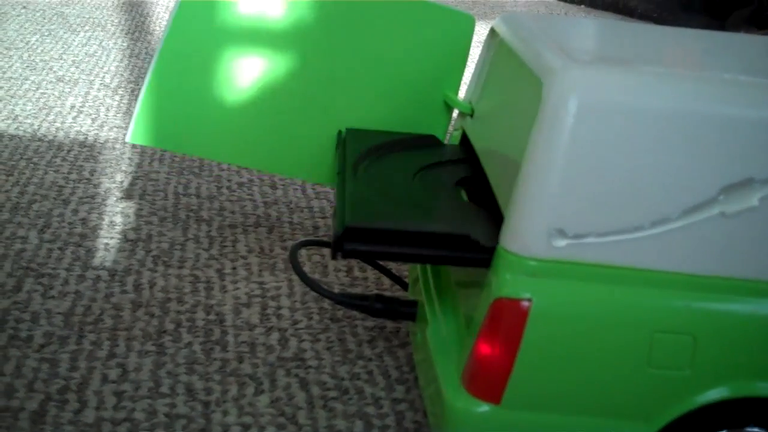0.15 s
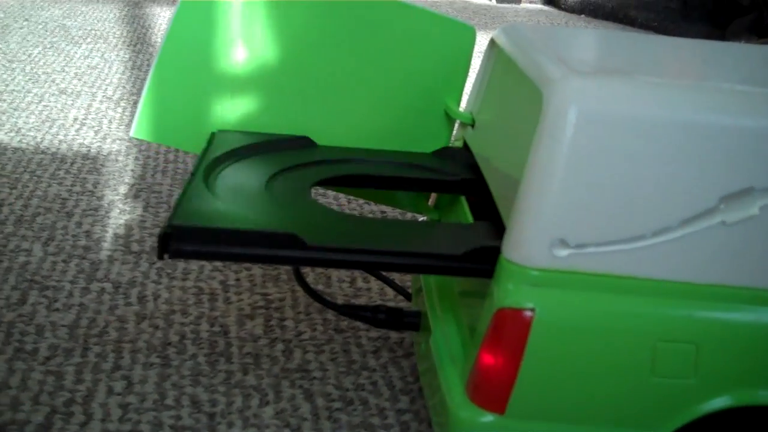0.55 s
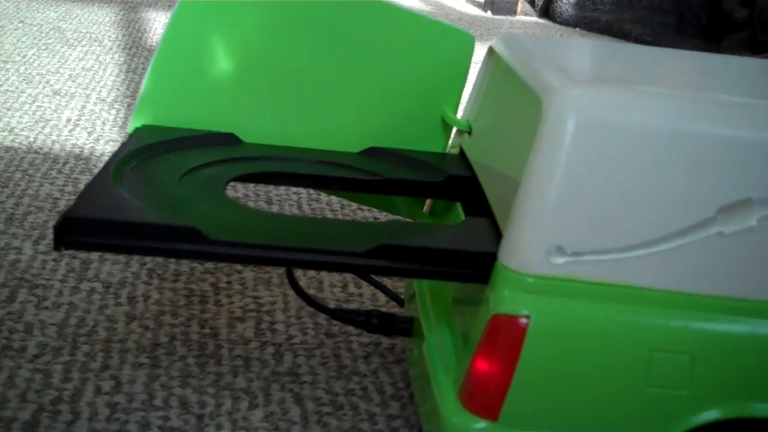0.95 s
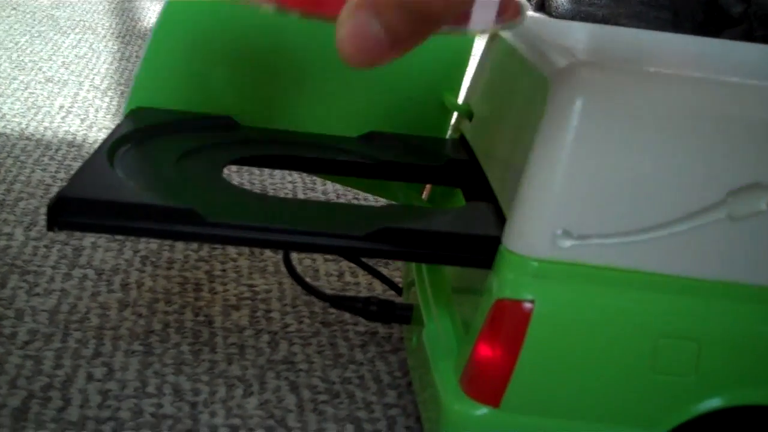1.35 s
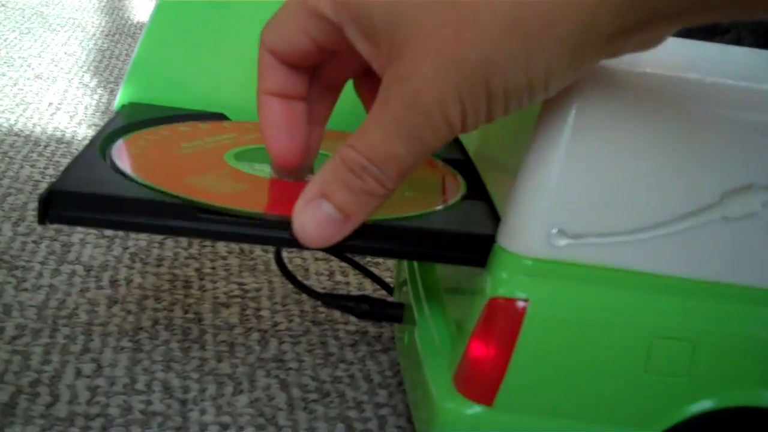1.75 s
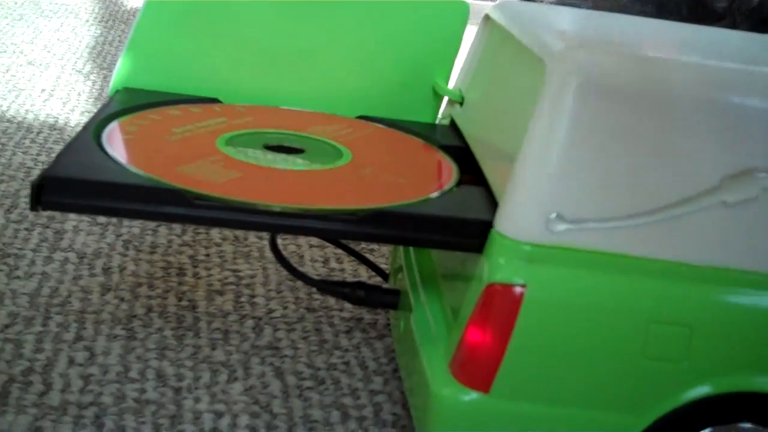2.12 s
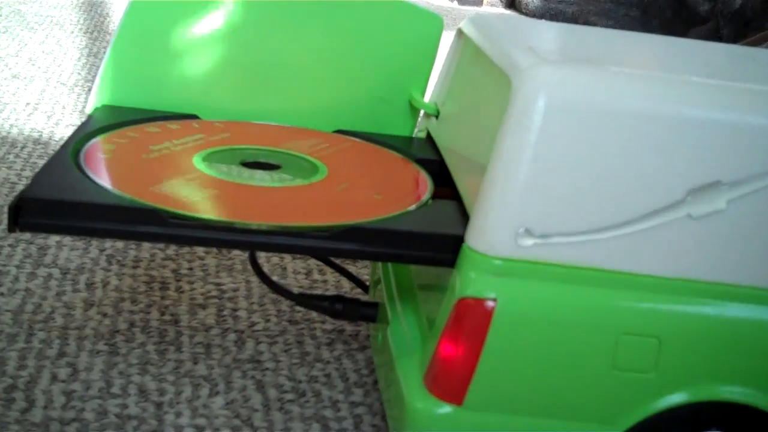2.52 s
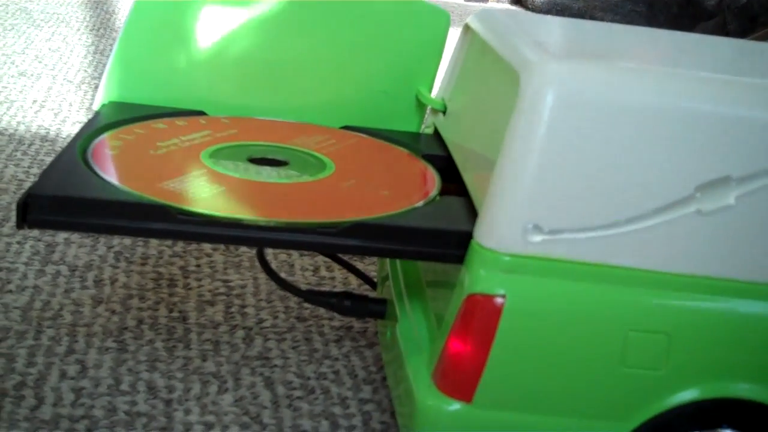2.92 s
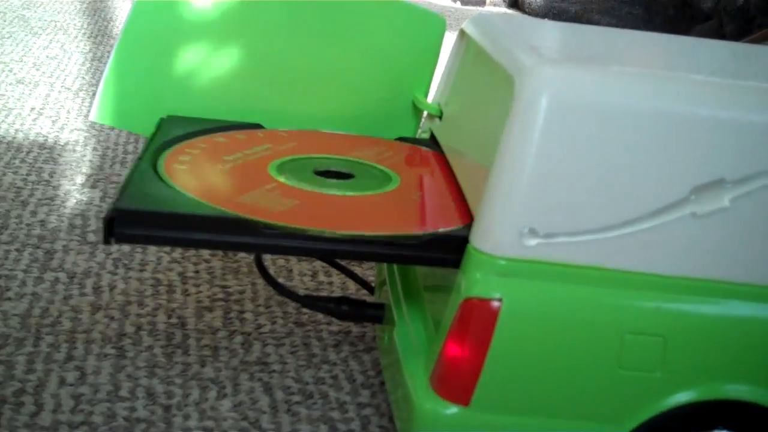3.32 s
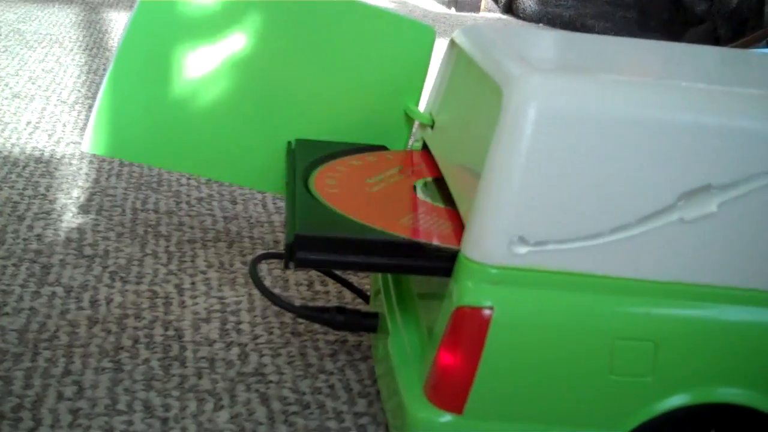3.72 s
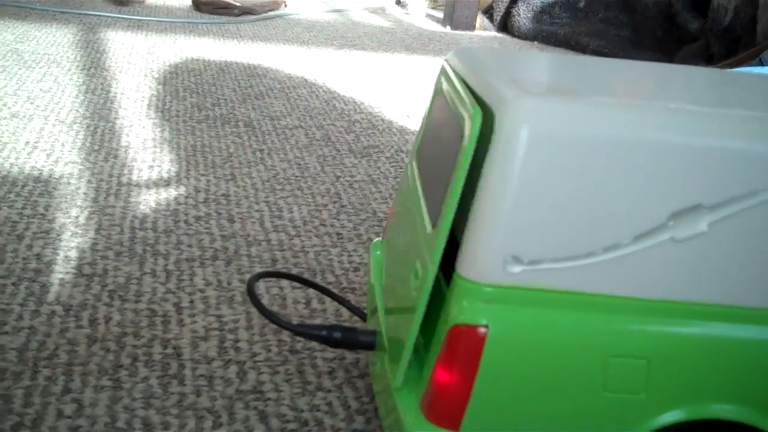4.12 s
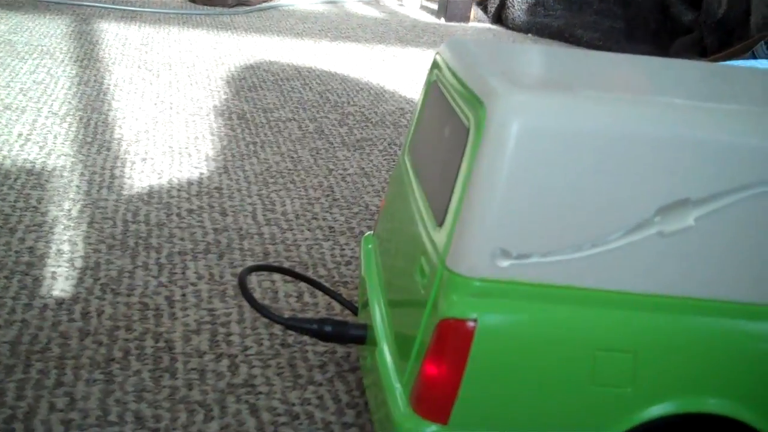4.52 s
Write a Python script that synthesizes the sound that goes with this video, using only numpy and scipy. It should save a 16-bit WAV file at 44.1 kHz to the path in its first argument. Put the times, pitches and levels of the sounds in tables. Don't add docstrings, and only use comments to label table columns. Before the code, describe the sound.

A small motor whirs a plastic tray out, a disc clacks into it, a button clicks, the tray whirs back and a hatch slams.

```python
import sys
import numpy as np
from scipy import signal
from scipy.fft import rfft, irfft, next_fast_len
from scipy.io import wavfile
from scipy.ndimage import uniform_filter1d, map_coordinates

SR = 44100
rng = np.random.default_rng(int(sys.argv[2]) if len(sys.argv) > 2 else 0)


def attenuation_scalar(level_db):
    decades = np.asarray(level_db, float) / 20
    return 10 ** decades


def dump_mix(stems):
    frames = np.atleast_2d(stems).T
    limited = np.clip(frames, -1, 1)
    pcm = np.round(limited * 32767).astype(np.int16)
    wavfile.write(sys.argv[1], SR, pcm)


N = 205542


def unit(x):
    return x / np.sqrt(np.mean(x ** 2) + 1e-20)


def along(points, hz):
    f, v = np.transpose(points)
    return np.interp(np.log(hz + 1), np.log(f + 1), v)


def curves(spans):
    t = np.arange(N) / SR
    time_s, *columns = np.transpose(np.concatenate(spans))
    gate = sum((t >= span[0][0]) & (t <= span[-1][0]) for span in spans) > 0
    return [np.interp(t, time_s, c) for c in columns], uniform_filter1d(gate * 1., size=600, mode="nearest")


def wobble(rate_hz):
    knots = rng.standard_normal(int(N * 40 / SR) + 4)
    return map_coordinates(knots, [np.arange(N) * min(rate_hz, 40) / SR])


def filtered(x, response):
    m = next_fast_len(N + SR // 4)
    return irfft(rfft(x, m) * response(np.fft.rfftfreq(m, 1 / SR)), m)[..., :N]


def modes(table):
    def response(f):
        total = 0
        for k, (hz, width_hz, db) in enumerate(table):
            damping = 1j * f * width_hz
            total = total + (-1) ** k * attenuation_scalar(db) * damping / (hz * hz - f * f + damping)
        return total
    return response


def glide(x, hz, width_hz):
    spin = np.exp(2j * np.pi * np.cumsum(np.broadcast_to(hz, len(x))) / SR)
    keep = np.exp(-np.pi * width_hz / SR)
    return np.real(spin * signal.lfilter([1 - keep], [1, -keep], x / spin))


def grit(share, spread_db):
    draw = rng.random((2, N))
    size = attenuation_scalar(-spread_db * np.log(draw[1] + .003))
    return unit((draw[0] < share) * size * rng.standard_normal(N))


# hz, level_db
SHEEN = [(3000, -74), (4500, -4), (6000, -1), (8000, -1), (10000, -3.5), (13000, 3), (16500, -74)]


def sheen(x):
    fold = irfft(np.log(attenuation_scalar(along(SHEEN, np.fft.rfftfreq(1024, 1 / SR)))))
    fold[1:512] *= 2
    fold[513:] = 0
    return signal.fftconvolve(x, irfft(np.exp(rfft(fold))))[:N]


# time_s, whirr_db, load_db, low_ridge_hz
DRIVE = [
    [(0, -45.5, 2.5, 6300), (.13, -42.5, -1, 6300), (.21, -39.5, 0.5, 6500), (.3, -39.5, 0, 7000),
     (.6, -39, -1, 6850), (.75, -43.5, -2, 6450), (.8, -40.5, -0.5, 6350), (.866, -46, 0.5, 6400),
     (.932, -50, -10.5, 6500)],
    [(3.25, -44, 2.5, 6350), (3.34, -40.5, -2, 6400), (3.49, -41, -3.5, 6500), (3.562, -36, -0.5, 6750),
     (3.62, -42, -2, 6250), (3.9, -40.5, -1.5, 6300), (4.02, -41, 2, 6330), (4.1, -39.5, 4, 6550),
     (4.15, -43.5, 3.5, 6550)],
    [(4.151, -49, 0, 6500), (4.256, -63, 3.5, 6500), (4.35, -73, -6.5, 6500), (4.41, -72, -2, 6500),
     (4.5, -95, -22, 6500)],
]
# out_share (0-1), cavity_hz, cavity_db, gear_db, mid_ridge_hz
TRAVEL = [(0, 610, -5, -13, 7780), (0.251, 650, -8, -16, 7620), (.37, 520, 1.5, -15, 7020),
          (.52, 760, -9, -26, 6900), (0.701, 630, -8, -19.5, 7600), (.9, 566, -15.5, -4.5, 7350),
          (1, 440, -6, -21, 7250)]
# pitch_hz, width_hz, level_db
RAIL = [(1430, 400, 3), (1840, 230, 4.5), (2250, 260, 1.5), (3140, 890, -3.5), (4070, 200, -5)]
# pitch_hz, width_hz, level_db
CASE = [(272, 73, -0.2), (395, 190, -7.5), (930, 52, -6)]


def drive():
    stop_out_s, start_in_s, travel_s = 0.92, 3.254, 1
    scrape_db, rumble_db, rumble_per_load, clamp_db = -49.5, -51, 1.31, 9.5
    (whirr_db, load_db, low_hz), on = curves(DRIVE)
    t = np.arange(N) / SR
    place, *shape = np.transpose(TRAVEL)
    out = 1 - np.maximum(stop_out_s - t, t - start_in_s) / travel_s
    cavity_hz, cavity_db, gear_db, mid_hz = [np.interp(out, place, c) for c in shape]
    turn = 2 * np.pi * np.cumsum(74 + 3 * wobble(8.1)) / SR
    load = attenuation_scalar(.7 * np.sin(turn) + .8 * np.sin(2 * turn) + 1.3 * wobble(30))

    def teeth():
        return load * grit(share=.25, spread_db=1.0)

    box = 0
    for ridge_hz, ridge_db in [(low_hz, -5), (mid_hz, -2), (8120, -5.5)]:
        hz = ridge_hz + 120 * wobble(7.3)
        ridge = glide(glide(teeth(), hz, 320), hz, 320)
        box = box + attenuation_scalar(ridge_db + wobble(12)) * unit(ridge)
    gear_mode = modes([(5370, 220, 0)])
    gear = attenuation_scalar(gear_db + 5 + 3 * wobble(13)) * unit(filtered(teeth(), lambda f: gear_mode(f) ** 2))
    hiss = attenuation_scalar(whirr_db - 16) * (box + gear + attenuation_scalar(4) * unit(sheen(teeth())))

    rail = sum(attenuation_scalar(2.2 * wobble(14)) * filtered(teeth(), modes([mode])) for mode in RAIL)
    scrape = attenuation_scalar(scrape_db + load_db) * unit(rail)

    cavity = glide(teeth(), cavity_hz + 70 * wobble(22), 130)
    case = unit(filtered(teeth(), modes(CASE))) + attenuation_scalar(cavity_db + 2) * unit(cavity)
    case_db = rumble_db + rumble_per_load * load_db + clamp_db * (out < 0) + 0.7 * wobble(18)
    return on * (hiss + scrape + attenuation_scalar(case_db) * case)


def ringing(blows, table):
    out, t = np.zeros(N + SR), np.arange(SR // 2) / SR
    onset = 1 - np.exp(-t / 0.0025)
    for start_s, blow_db in blows:
        at = round(start_s * SR)
        for hz, db, t60_s in table:
            rough = unit(glide(rng.standard_normal(len(t)), hz, 55))
            ring = np.sin(2 * np.pi * (hz * t + rng.random())) + .38 * rough
            out[at:at + len(t)] += attenuation_scalar(db + blow_db - 60 * t / t60_s) * ring * onset
    return out[:N]


# pitch_hz, level_db, t60_s
HATCH = [(186, -21.5, .07), (273, -13, 0.2), (330, -24, .1), (530, -16.5, 0.048), (700, -1.5, 0.069),
         (719, -25, 0.73), (840, -34, 0.16), (1300, -10, 0.085), (1560, -38.5, 0.99), (1890, -14, 0.065)]
# start_s, level_db
HATCH_BLOWS = [
    (4.2075, -6),
    (4.294, -24),
]
# pitch_hz, level_db, t60_s
DISC = [(1360, -29, 0.071), (650, -40.5, 0.069), (2070, -41, 0.072)]
# start_s, level_db
DISC_BLOWS = [
    (1.811, 4),
    (1.93, -25),
]


def hatch_and_disc():
    return ringing(HATCH_BLOWS, HATCH) + ringing(DISC_BLOWS, DISC)


# start_s, peak_db, weight_db, t60_s, ring_hz
TRAY_TICKS = [(.0145, -17, -15, 0.019, 1370), (.0823, -23.5, -14, 0.06, 3960),
              (.1334, -22.5, -8.5, 0.031, 4300), (.182, -33, -5.5, 0.2, 4170),
              (.5222, -7, -18.5, 0.024, 1620), (.8445, -15.5, -17.5, 0.058, 1680),
              (.8642, -22.5, -9.5, 0.088, 2130), (.9297, -43, 8.5, 0.035, 1430)]
FINGER_TAPS = [(1.0154, -54.5, 3, 0.052, 730), (1.1019, -44.5, -7, 0.069, 680),
               (1.1438, -42, -1, 0.045, 700), (1.261, -40.5, -5.5, 0.065, 664),
               (1.3174, -43, -13, .04, 2220), (1.4245, -46.5, 1.5, .1, 660), (1.492, -32, -4, 0.023, 670),
               (3.0616, -14.5, -10, 0.046, 870)]
DISC_CLACKS = [(1.7774, -8, -18.5, 0.023, 4800), (1.793, -29, -2, 0.048, 4030),
               (1.8007, -6, -13.5, 0.037, 4670), (1.813, -37, 12.5, 0.028, 1390),
               (1.8791, -18.5, -18, 0.027, 4830), (1.9062, -28, 0, 0.15, 2530),
               (1.9164, -7, -31.5, 0.035, 4350), (2.062, -23, -11.5, 0.039, 4000),
               (2.5334, -60.5, 9.5, .046, 1480)]
BUTTON_CLICKS = [(3.0081, 0.5, -12.5, 0.025, 4090), (3.0124, -5, -10.5, 0.035, 1425),
                 (3.0361, -24, -13, 0.12, 5170), (3.1763, -6, -6, 0.027, 1470),
                 (3.1811, -24.5, -5, 0.14, 1380)]
RACK_CATCHES = [(3.2208, -22.5, -17, 0.027, 5530), (3.2393, 2, -21, 0.022, 8550),
                (3.2558, -11, -12.5, 0.025, 4660), (3.2713, -14, -14, 0.049, 4570),
                (3.2855, -24, -5.5, 0.049, 4040), (3.3182, -38, 3, 0.091, 1360),
                (4.021, -11.5, -14, 0.046, 1680), (4.0716, -25, -8.5, 0.11, 3600)]
HATCH_CLACKS = [(4.185, -11.5, -13, 0.028, 3520), (4.1961, -5.5, -11.5, 0.04, 8800),
                (4.206, 13.5, -10, 0.026, 1890), (4.2101, 1.5, -10.5, 0.03, 1300),
                (4.215, -18, -0.5, 0.097, 1300)]
LATCH_RATTLES = [(4.2982, -38, -6, 0.065, 1360), (4.3209, -34, -1, 0.025, 1630),
                 (4.333, -46, 5, 0.04, 1370), (4.3663, -38.5, 6, 0.037, 1550),
                 (4.3875, -28, -2, 0.016, 1720), (4.4071, -34.5, 0.5, 0.056, 1440),
                 (4.5553, -46.5, 1.5, 0.15, 358), (4.6132, -34, -16, .025, 1380)]
# pitch_hz, width_hz, level_db
PLASTIC = [(1380, 298, 3.5), (1753, 466, 5), (2095, 660, 4.5), (2880, 1650, -0.5), (3985, 940, -2),
           (4600, 210, -14.5)]
# pitch_hz, width_hz, level_db
HOLLOW = [(279.7, 55, 1), (392, 65, -2.5), (466, 37, -5), (654, 178, -1.5), (935, 210, -10.5)]


def clicks():
    # contacts, knock_db, part_ring_db
    parts = [(TRAY_TICKS, -4.5, 0), (FINGER_TAPS, 0, 7.4), (DISC_CLACKS, -13, 0), (BUTTON_CLICKS, -12.5, 0),
             (RACK_CATCHES, -6, 0), (HATCH_CLACKS, 0, 0), (LATCH_RATTLES, -2, 15)]
    bright, ring, body, knock = np.zeros((4, N + SR // 4))
    t = np.arange(SR // 5) / SR
    onset = 1 - np.exp(-t / 0.00014)
    for contacts, knock_db, part_ring_db in parts:
        for start_s, peak_db, weight_db, t60_s, ring_hz in contacts:
            decay = attenuation_scalar(peak_db - 60 * t / max(t60_s, .005))
            chatter = rng.standard_normal(len(t)) * decay * onset
            at = slice(round(start_s * SR), round(start_s * SR) + len(t))
            ring_db = (weight_db if ring_hz < 4300 else -14) + 13 + part_ring_db
            bright[at] += attenuation_scalar(-17.0) * chatter
            ring[at] += attenuation_scalar(ring_db) * glide(chatter, ring_hz, .07 * ring_hz)
            body[at] += attenuation_scalar(weight_db + 3.0) * chatter
            knock[at] += attenuation_scalar(knock_db + 1.7 * weight_db + 18.5) * chatter
    return sheen(bright) + ring[:N] + filtered(body, modes(PLASTIC)) + filtered(knock, modes(HOLLOW))


# start_s, length_s, level_db, ring_1_hz, ring_2_hz
SCUFFS = [(.803, .035, -41, 1390, 1420), (.85, .1, -41, 385, 280), (1.385, .1, -55, 2200, 650),
          (1.892, .056, -33, 2110, 4870), (1.983, .06, -55, 4270, 6660), (2.007, .026, -49, 4600, 8350),
          (2.024, .03, -50, 4730, 6600), (2.054, .02, -44, 3960, 6400), (2.52, .084, -57, 1600, 1750),
          (3.254, .046, -37, 4400, 4900), (4.03, .11, -44, 2900, 4300), (4.275, .1, -37, 1400, 1750),
          (4.34, .11, -41, 1470, 2000), (4.426, .12, -51, 1640, 1400)]


def scuffs():
    out, grains = np.zeros(N + SR), grit(share=0.47, spread_db=4.0)
    for start_s, length_s, db, *rings_hz in SCUFFS:
        t = np.arange(round(length_s * SR) + 900) / SR
        at = round(start_s * SR)
        drag = grains[at:at + len(t)] * np.sin(np.pi * np.minimum(t / length_s, 1)) ** 2
        rings = sum(glide(drag, hz, 70 + 0.025 * hz) for hz in rings_hz)
        out[at:at + len(t)] += attenuation_scalar(db + 16) * rings + attenuation_scalar(db - 20) * drag
    return out[:N]


# start_s, length_s, level_db, weight_db (thud up, rustle down)
HAND = [(.89, .1, -61, 6.5), (1.0, 0.63, -62.5, -29), (1.77, 0.25, -52, 0), (1.96, .17, -45, -8),
        (2.101, .65, -65, -18), (2.55, 0.58, -61, -17), (3.0, 0.18, -47.5, -8.5),
        (3.216, 0.083, -38, -11.5), (4.42, 0.32, -53.5, -5.5)]


def hand():
    t = np.arange(N) / SR

    def swell(tilt):
        total = 0
        for start_s, length_s, db, weight_db in HAND:
            stroke = np.sin(np.pi * np.clip((t - start_s) / length_s, 0, 1)) ** 2
            total = total + attenuation_scalar(db + tilt * weight_db) * stroke
        return total

    drag = grit(share=.2, spread_db=2.4) * attenuation_scalar(2.5 * wobble(35))
    rustle = swell(-0.53) * attenuation_scalar(-23.5) * unit(sheen(drag))
    rub = swell(0) * attenuation_scalar(-8.5) * unit(filtered(drag, modes(PLASTIC)))
    thud = swell(1) * attenuation_scalar(2.0) * unit(filtered(drag, modes(HOLLOW)))
    return rustle + rub + thud


def room(x, decays):
    hz, t, z = signal.stft(rng.standard_normal((2, SR // 4)), SR, nperseg=128)
    tail = signal.istft(z * attenuation_scalar(-60 * t / along(decays, hz)[:, None]), SR, nperseg=128)[1]
    delayed = np.pad(x, (40, 0))[None]
    return signal.fftconvolve(delayed, tail / np.linalg.norm(tail[0]), axes=1)[:, :N]


# pitch_hz, width_hz, steepness
PORTS = [(7740, 1210, 1.161), (6300, 1750, 1.32)]


def ports(x):
    lag_s = 3.5e-5

    def response(f):
        cavity = [(c * c / (c * c - f * f + 1j * f * w)) ** steepness for c, w, steepness in PORTS]
        return np.array(cavity) * np.exp(-1j * np.pi * f * lag_s * np.array([[1], [-1]]))

    return filtered(x, response)


# hz, density_db
AIR = [(12, -36.5), (25, -14.5), (131, 1), (178, -9.5), (236, -3), (450, -11.5), (876, -10), (1470, -15),
       (3250, -20.5), (7790, -20), (9500, -26), (13000, -29), (16000, -15.5)]
# hz, correlation
ALIKE = [(60, 0.65), (120, 0.95), (250, 0.96), (510, 0.62), (1040, 0.4), (2130, 0.21), (4350, -0.45),
         (8880, 0.16)]


def air():
    def response(hz):
        turn = np.arccos(np.clip(along(ALIKE, hz), -1, 1)) / 2
        return attenuation_scalar(along(AIR, hz)) * [np.cos(turn), np.sin(turn)]

    mid, side = filtered(rng.standard_normal((2, N)), response)
    return attenuation_scalar(-53) * unit(np.array([mid + side, mid - side]))


# hz, t60_s
SCATTER = [(500, 0.019), (8000, 0.014)]
# hz, t60_s
ROOM = [(200, 0.064), (1500, 0.57), (5000, 0.49), (12000, 0.35)]


def scene():
    steady = drive() + hand()
    hits = clicks() + hatch_and_disc() + scuffs()
    near = steady + hits
    scatter = attenuation_scalar(-16.5) * room(near, SCATTER)
    reverb = attenuation_scalar(-13.5) * room(steady, ROOM) + attenuation_scalar(-24.5) * room(hits, ROOM)
    return ports(near + scatter + reverb) + air()


def top_cut(x):
    return signal.sosfilt(signal.butter(12, 14200, fs=SR, output="sos"), x)


def record(dry):
    clipped = dry / (1 + np.abs(dry) ** 8) ** (1 / 8)
    return top_cut(clipped)


dry = scene()
out = record(dry)
dump_mix(out)
```